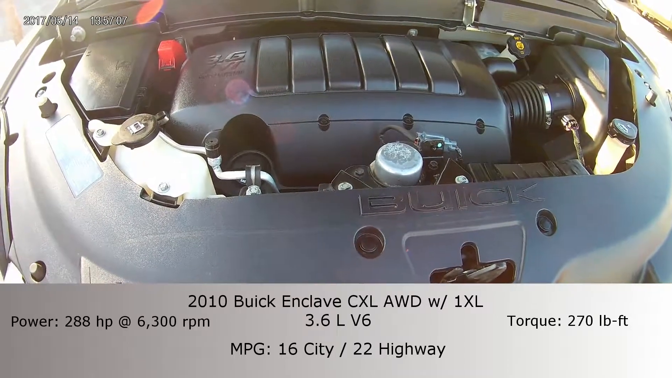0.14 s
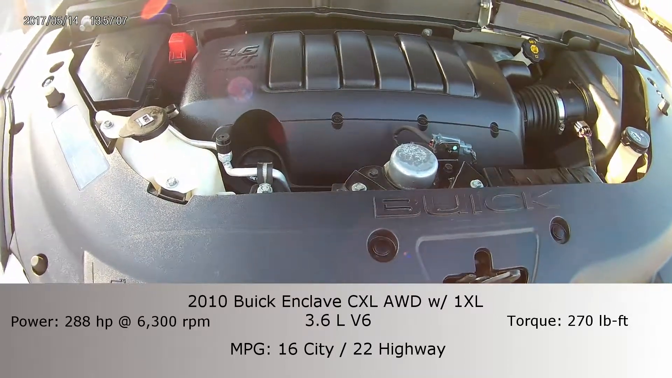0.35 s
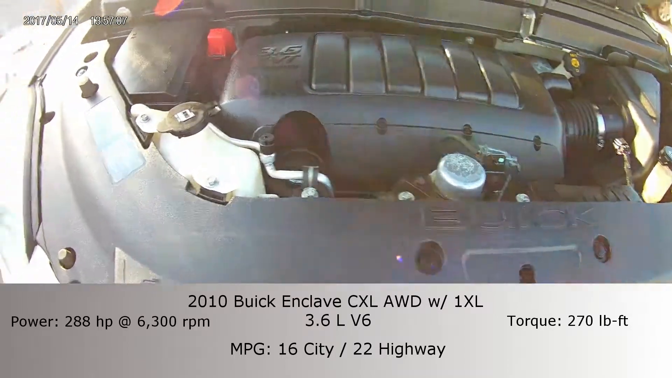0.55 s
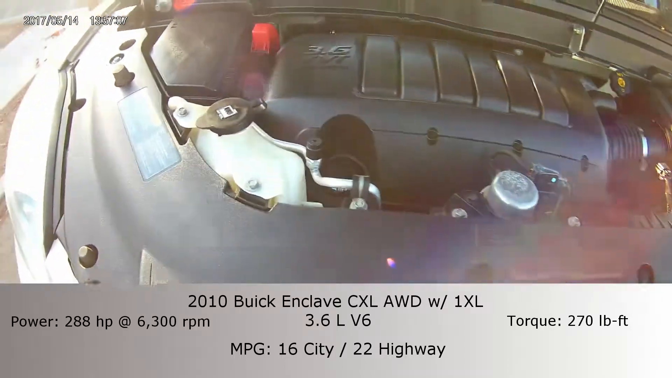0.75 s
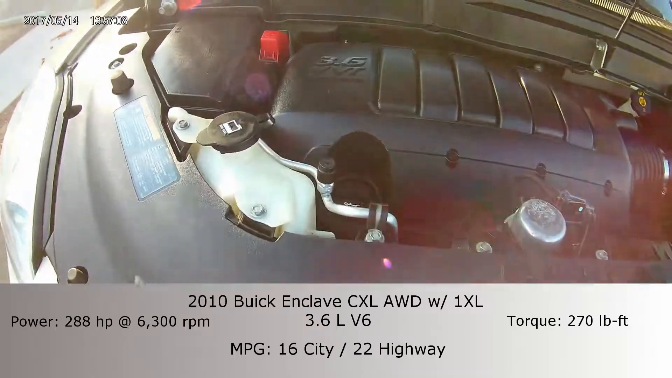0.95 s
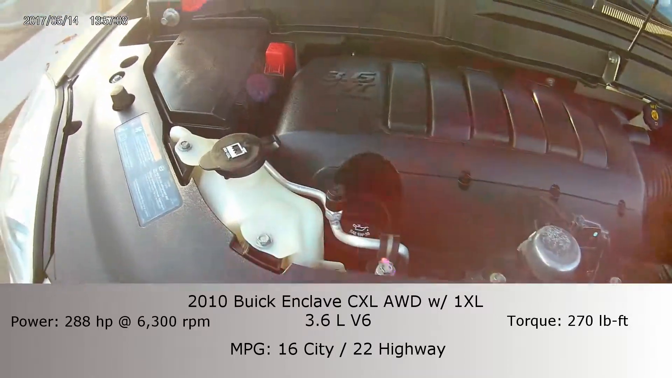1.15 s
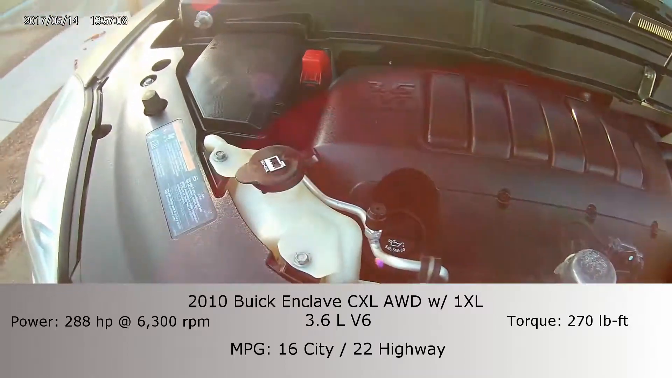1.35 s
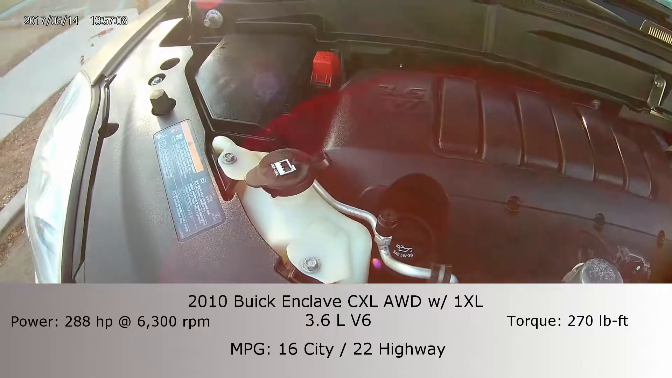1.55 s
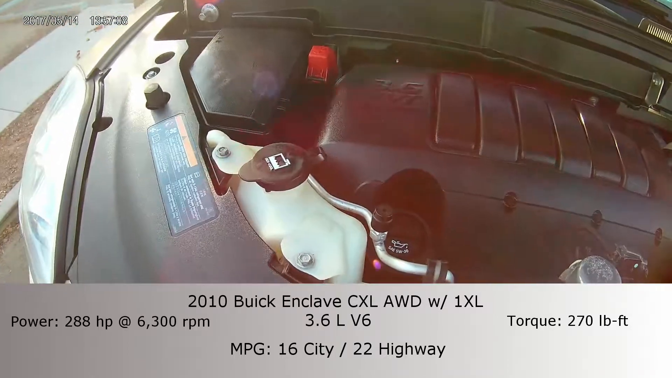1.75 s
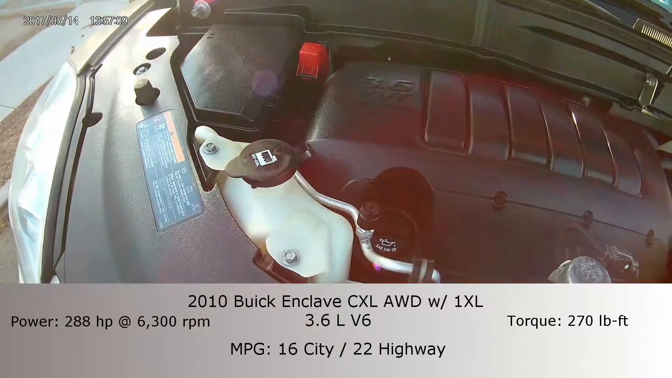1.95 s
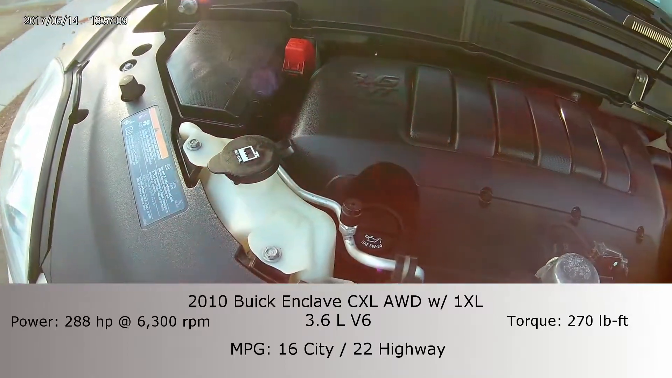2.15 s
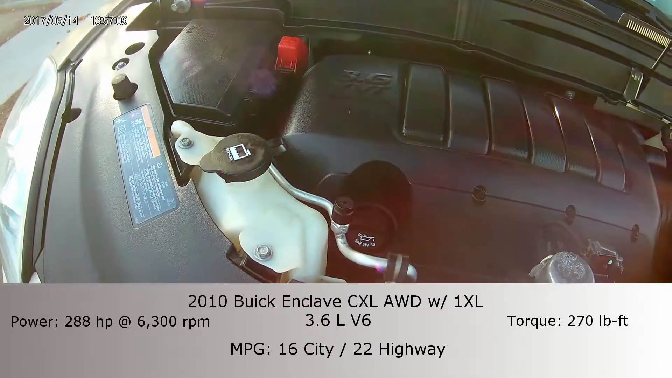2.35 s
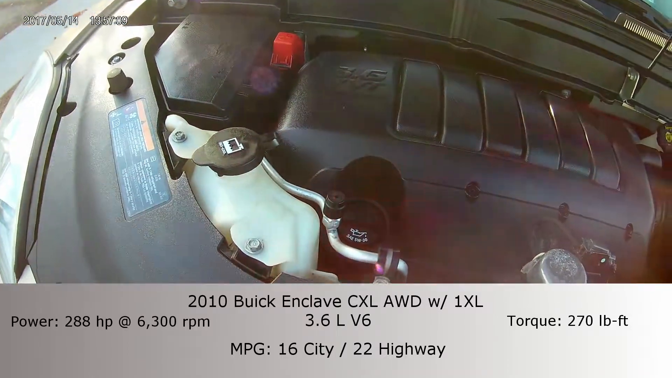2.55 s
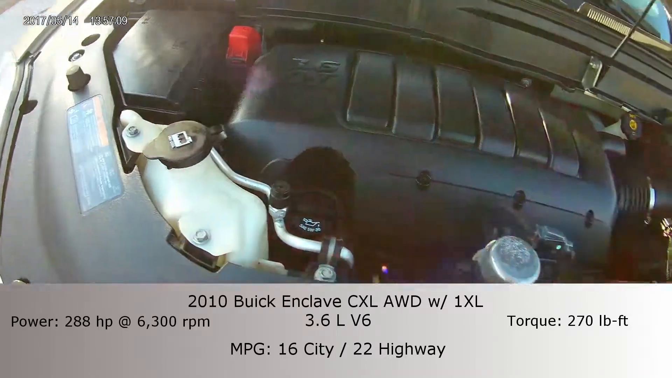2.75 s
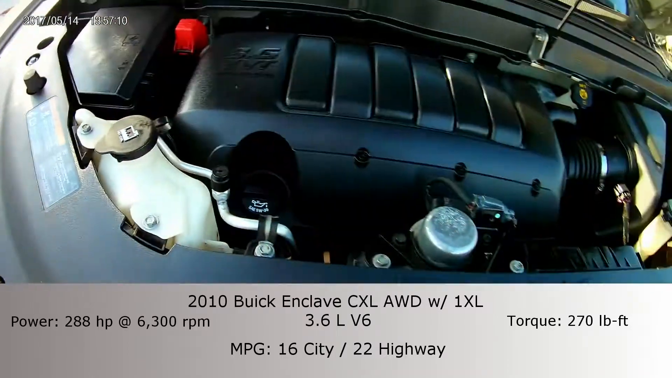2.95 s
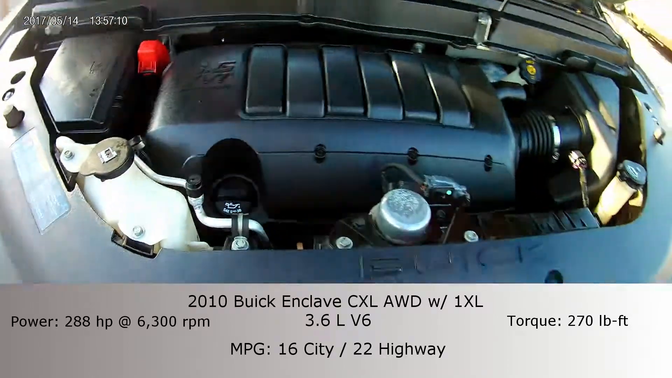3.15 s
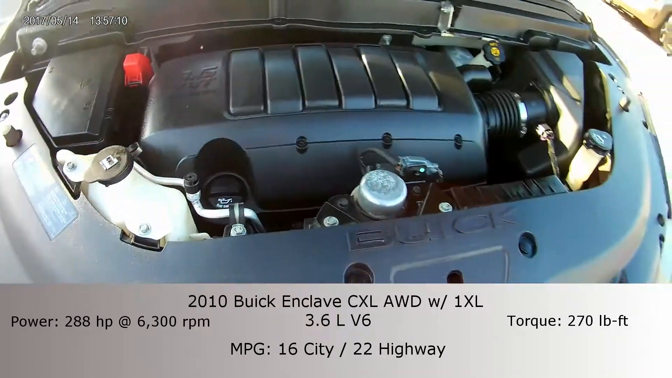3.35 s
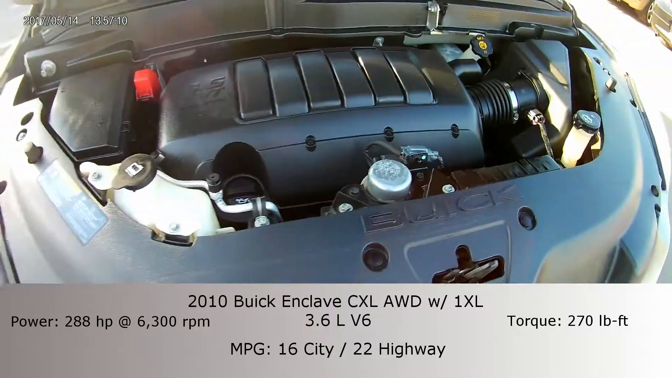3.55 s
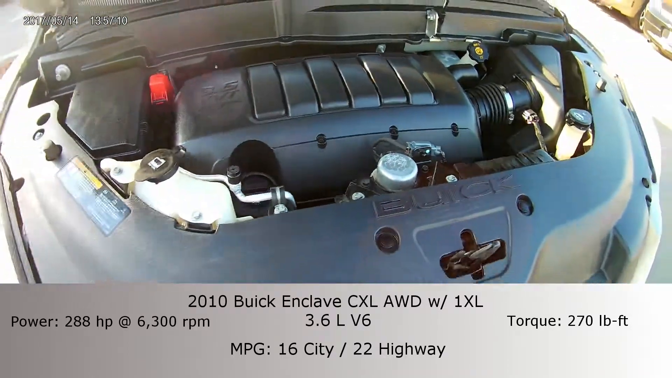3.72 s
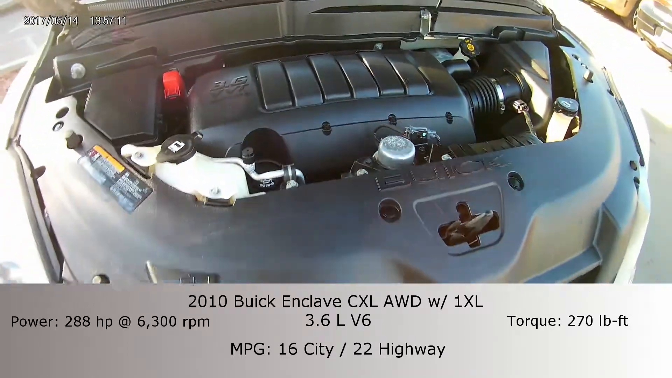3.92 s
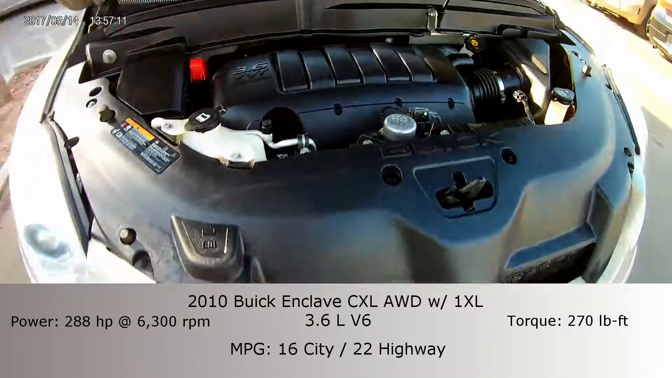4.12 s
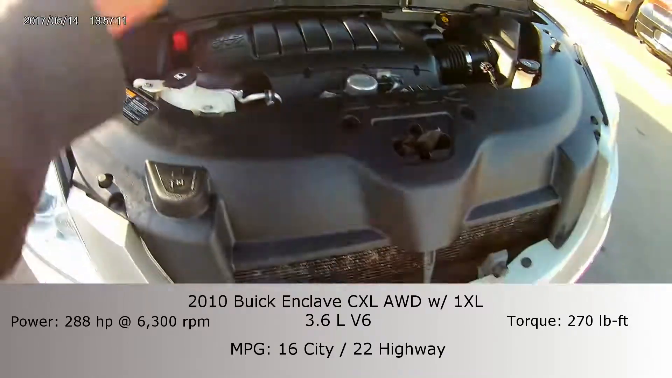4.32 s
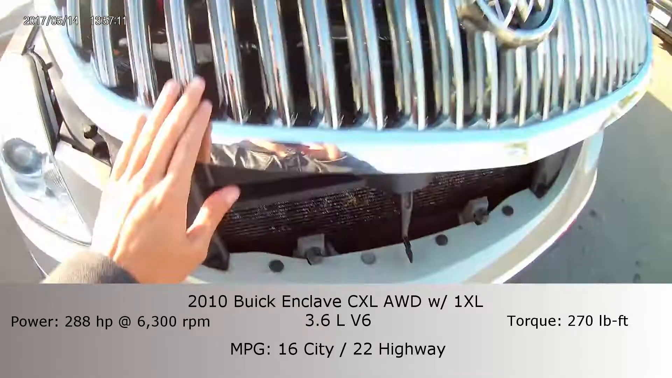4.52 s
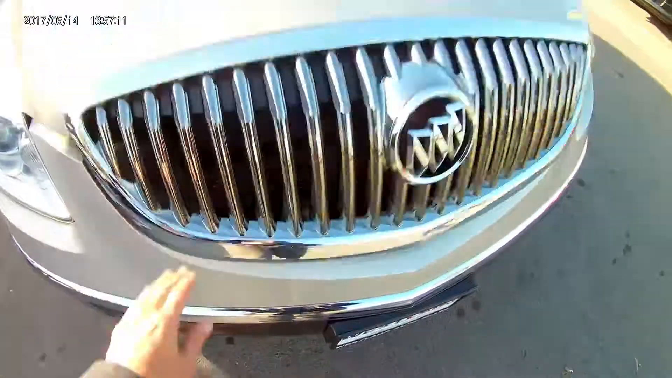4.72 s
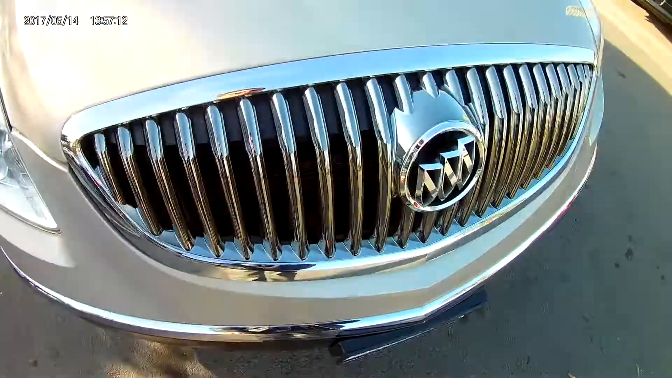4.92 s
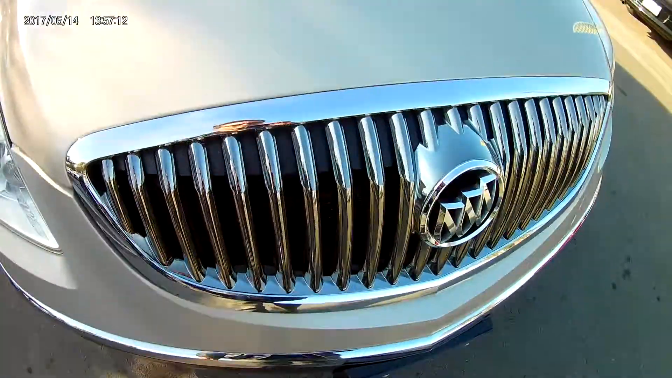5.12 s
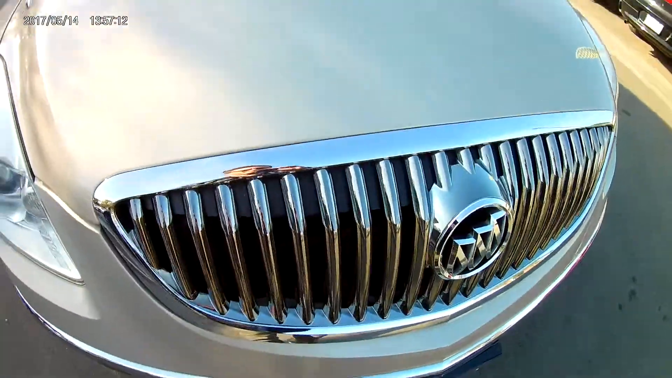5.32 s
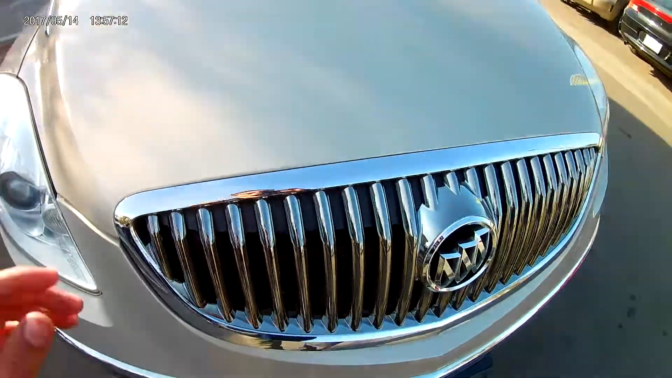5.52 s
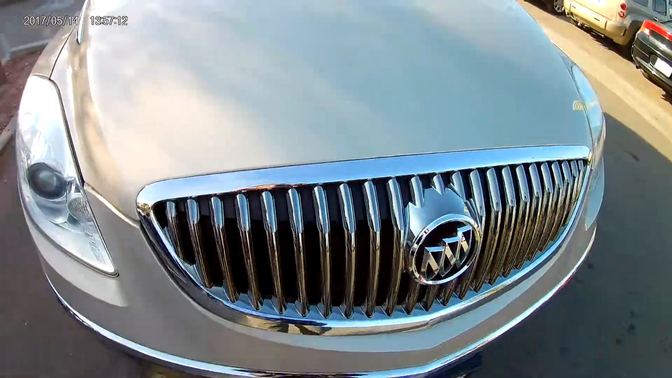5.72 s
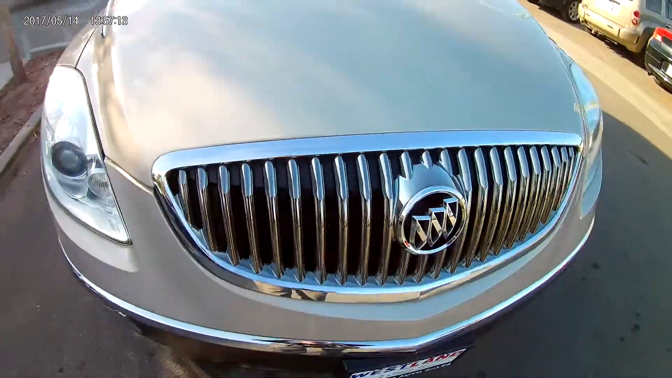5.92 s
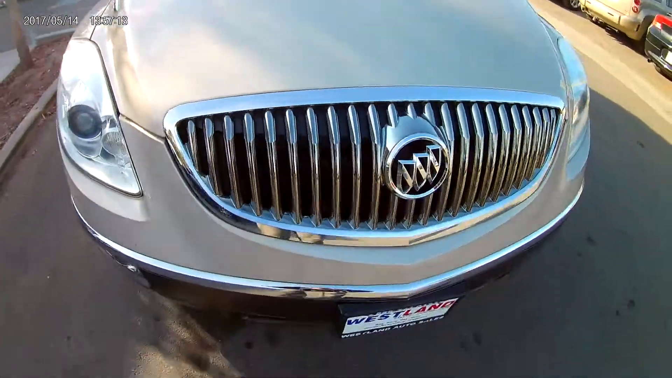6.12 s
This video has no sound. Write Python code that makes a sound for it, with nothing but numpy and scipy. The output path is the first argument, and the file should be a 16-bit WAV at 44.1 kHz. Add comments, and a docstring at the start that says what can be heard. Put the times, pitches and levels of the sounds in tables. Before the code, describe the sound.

Outdoors beside a parked car, a low road rumble and wavering engine hum run throughout. Faint plastic ticks dot the first seconds. Near four seconds the hood struts hiss in creaky slips and hinges groan softly; then the hood slams with a loud, clattering steel bang that overloads the small close microphone. Short echoes fade, leaving the same hum.

```python
"""A far road roars and engines hum all through; faint brief puffs of treble noise and small plastic ticks come and go.
Then a car's steel hood is pulled down: gas hisses through its struts in slips, the hinges groan, air is pushed out.
It slams on its latch in a run of blows that ring damped steel modes, shake loose trim (chattering noise) and
dip the car on its springs, with echoes off parked cars. The small microphone overloads and hisses."""
import sys
import numpy as np
from scipy import signal
from scipy.fft import rfft, irfft, next_fast_len
from scipy.io import wavfile
from scipy.ndimage import uniform_filter1d, map_coordinates

SR = 44100
rng = np.random.default_rng(int(sys.argv[2]) if len(sys.argv) > 2 else 0)


def file_out(sig):
    """Save sig as 16-bit WAV at sys.argv[1]."""
    # one column per channel
    cols = np.atleast_2d(sig).T
    # limit, then scale
    lim = np.clip(cols, -1, 1)
    pcm = np.round(lim * 32767).astype(np.int16)
    wavfile.write(sys.argv[1], SR, pcm)


N = 276418
T = np.arange(N) / SR


def amp(db):
    """Decibels to gain."""
    return 10 ** (np.asarray(db) / 20)


def unit(x):
    """Scaled to rms 1."""
    return x / np.sqrt(np.mean(x ** 2) + 1e-20)


def along(points, hz):
    """(Hz, value) points read along a log frequency axis."""
    f, v = np.transpose(points)
    return np.interp(np.log(hz + 1), np.log(f + 1), v)


def curves(rows):
    """One value per sample for each column after the time."""
    s, *cols = np.transpose(rows)
    return [np.interp(T, s, c) for c in cols]


def wobble(rate):
    """A smooth random curve, rate knots a second."""
    knots = rng.standard_normal(int(N * rate / SR) + 4)
    return map_coordinates(knots, [T * rate])


def gate(start, end, fade):
    """1 from start to end, fading to 0 outside."""
    return np.clip(np.minimum(T - start, end - T) / fade + 1, 0, 1)


def swell(start, peak, end):
    """A smooth rise to 1 and fall to 0."""
    return np.sin(np.pi / 2 * np.interp(T, [start, peak, end], [0, 1, 0]))


def filtered(x, response):
    """x times a response of frequency."""
    m = next_fast_len(len(x) + 8192)
    return irfft(rfft(x, m) * response(np.fft.rfftfreq(m, 1 / SR)), m)[:len(x)]


def resonances(modes):
    """The summed response of (Hz, width, dB) resonances, with alternating signs."""
    def response(f):
        total = 0
        for k, (centre, width, db) in enumerate(modes):
            damping = 1j * f * width
            total = total + (-1) ** k * amp(db) * damping / (centre * centre - f * f + damping + 1e-9)
        return total
    return response


def rush(spectrum, patchy_db):
    """Noise of rms 1, shaped by a spectrum, with time-frequency patches of random gain."""
    z = signal.stft(rng.standard_normal(N + 512), nperseg=512)[2]
    across_pitch = uniform_filter1d(rng.standard_normal(z.shape), 5, 0)
    patches = unit(uniform_filter1d(across_pitch, 14, 1))
    noise = signal.istft(z * amp(patchy_db * patches), nperseg=512)[1][:N]
    return unit(filtered(noise, lambda hz: amp(along(spectrum, hz))))


def tone(hz, db, waver_db, drift):
    """A sine around the given rms level, unsteady in pitch and loudness."""
    phase = 2 * np.pi * np.cumsum(hz * (1 + drift * wobble(9))) / SR
    level = np.sqrt(2) * amp(db + waver_db * wobble(7))
    return level * np.sin(phase + rng.uniform(0, 2 * np.pi))


def ringing(modes, t, attack, scatter_db, detune):
    """Damped modes, at new strengths, signs and slightly new pitches as each blow flexes the steel."""
    luck = rng.standard_normal((len(modes), 3))
    total = 0
    for (hz, db, t60), (strength, shift, sign) in zip(modes, luck):
        decay = amp(db + scatter_db * strength - 60 * t / t60)
        total = total + np.sign(sign) * decay * np.sin(2 * np.pi * hz * (1 + detune * shift) * t)
    return (1 - np.exp(-t / attack)) * total


def traffic():
    """A far road: exhaust rumble, a middle drone, tyre roar and tyre sizzle as four drifting noise bands."""
    # the road's swells: t/s, rumble level/dB, middle drone level/dB, tyre roar level/dB, tyre sizzle level/dB
    road_levels = [(0, -42, -45, -43, -58.5), (.2, -36.5, -45, -41, -60), (.9, -38, -47.5, -43, -60),
                   (1.42, -39.5, -54, -44.5, -62), (2.2, -41, -52.5, -45.5, -62.5),
                   (2.8, -40.5, -53, -47, -62.5), (3.28, -41, -51.5, -45.5, -60),
                   (3.6, -40, -46.5, -44, -57), (4.05, -38, -43.5, -43.5, -59.5),
                   (4.6, -40, -45.5, -42, -58), (5.12, -38, -44, -41.5, -60),
                   (5.4, -38.5, -46.5, -45, -61.5), (5.75, -38, -46, -42.5, -59.5),
                   (6.27, -38.5, -45, -41, -60.5)]
    # exhaust rumble: f/Hz, relative level per Hz/dB
    rumble_spectrum = [(12, -54), (20, -12.5), (40, -5), (91, -3.5), (167, -8), (188, -19.5), (238, -8),
                       (375, -16), (450, -26.5), (580, -60), (990, -120)]
    # middle drone: f/Hz, relative level per Hz/dB
    drone_spectrum = [(200, 12.5), (330, -4.5), (480, 4), (700, -10), (1000, -9.5)]
    # tyre roar: f/Hz, relative level per Hz/dB
    tyre_spectrum = [(320, -30), (550, -3.5), (688, -1), (1020, 0), (1150, -2.5), (1380, -4), (1800, -12.5),
                     (2340, -31), (3960, -120)]
    # tyre sizzle: f/Hz, relative level per Hz/dB
    sizzle_spectrum = [(1060, -39), (1800, 0), (2160, -5), (2920, -15.5), (4130, -23.5), (6000, -37),
                       (7800, -44), (13200, -120)]
    rumble_db, drone_db, tyre_db, sizzle_db = curves(road_levels)
    drone_band = [(22, -120), *drone_spectrum, (3000, -120)]
    rumble = amp(rumble_db + 0.83 * wobble(4.03)) * rush(rumble_spectrum, patchy_db=0.43)
    drone = amp(drone_db + 1.34 * wobble(3.996)) * rush(drone_band, patchy_db=0.3)
    tyres = amp(tyre_db + 0.63 * wobble(6)) * rush(tyre_spectrum, patchy_db=1.1)
    sizzle = amp(sizzle_db + 0.6 * wobble(6)) * rush(sizzle_spectrum, patchy_db=1.3)
    return rumble + drone + tyres + sizzle


def engines():
    """Wavering sines: an idle near by that sinks once, and gliding engine notes that come and go on the road."""
    # steady orders of the idling engine: f/Hz, level/dB
    idle_orders = [(60, -47), (90, -44)]
    # engines on the road: start t/s, end t/s, first f/Hz, last f/Hz, level/dB
    road_notes = [(.1, .6, 52.1, 52, -47), (.1, 0.957, 126, 126.2, -42), (0.105, 1.456, 167, 163.2, -45),
                  (.15, 1.1, 221, 221, -51), (1.8, 3.448, 163, 159.9, -47), (2.05, 4.6, 50.9, 50.87, -45.5),
                  (2.9, 3.797, 125.1, 132.8, -46), (4.352, 4.6, 134.8, 138, -46),
                  (5.55, 5.894, 114.2, 111.6, -37), (6.05, 6.398, 241.4, 236.5, -45.5)]
    drift = 0.005  # pitch unsteadiness, as a fraction
    fade_db = -3.5 * gate(3.8, N / SR, fade=0.6)  # the idle sinks as the listener steps back, done by 3.8 s
    out = sum(tone(hz, db + fade_db, waver_db=1.5, drift=drift) for hz, db in idle_orders)
    for start, end, first_hz, last_hz, db in road_notes:
        glide_hz = np.interp(T, [start, end], [first_hz, last_hz])
        out = out + gate(start, end, fade=0.05) * tone(glide_hz, db, waver_db=2.0, drift=drift)
    return out


def treble_puffs():
    """Faint brief puffs of treble noise: a broad resonance shapes the noise, each puff swells and fades quickly."""
    # puffs: peak t/s, level/dB
    puffs = [(.184, -74), (.268, -71), (.575, -74), (5.594, -72), (5.7, -72), (5.742, -73)]
    rise_s, fall_s = 0.03, 0.015
    treble = resonances([(9500, 6000, 0)])
    noise = unit(filtered(rng.standard_normal(N), lambda f: treble(f) ** 2))
    return sum(amp(db) * swell(s - rise_s, s, s + fall_s) for s, db in puffs) * noise


def ticks():
    """Plastic trim ticks under a hand: a short pitched noise burst, a brighter snap and a dull knock."""
    # clacks: t/s, level/dB, pitch f/Hz, bright snap level/dB (relative)
    clacks = [(2.639, -68, 3800, -10), (2.823, -64, 3940, -12), (3.397, -63, 4760, -14),
              (3.49, -77, 4900, -17), (3.561, -56, 4500, -10), (3.636, -60, 4450, -27),
              (3.682, -65, 4670, -18), (3.706, -57.5, 4140, -18), (4.143, -59, 4170, -14),
              (4.665, -58, 3290, -16), (5.196, -56, 3300, -2)]
    out, t = np.zeros(N + SR), T[:SR // 20]
    for s, db, hz, snap_db in clacks:
        envelope = amp(-60 * t / 0.049) * (1 - np.exp(-t / 0.0009))
        burst = rng.standard_normal((3, len(t))) * envelope
        plastic = resonances([(hz, 2100, 4.6)])
        pitched = filtered(burst[0], lambda f: plastic(f) ** 3)
        snap = amp(snap_db) * filtered(burst[1], resonances([(6000, 9000, 0)]))
        knock = filtered(burst[2], resonances([(1400, 710, 16)]))
        out[round(s * SR):][:len(t)] += amp(db) * (pitched + snap + knock)
    return out[:N]


def struts():
    """Gas forced through the strut valves in slips, a dull groan of the hinges and air pushed out of the bay."""
    # hood moves: start t/s, fastest t/s, stop t/s, hiss level/dB, groan level/dB, air level/dB, creak 0-1
    moves = [(3.82, 3.9, 4.13, -66.5, -42, -48.5, .7), (4.047, 4.205, 4.45, -73.5, -48, -53.5, .1),
             (4.61, 4.693, 4.75, -60, -43.5, -41, 0.25)]
    # valve hiss resonances: f/Hz, width/Hz, relative level/dB
    valve_modes = [(3860, 430, 8), (5960, 4100, -7)]
    # hinge groan resonances, before squaring: f/Hz, width/Hz, relative level/dB
    hinge_modes = [(945, 144, 0), (1302, 220, -0.5)]
    # air squeezed out of the bay, before squaring: f/Hz, width/Hz, relative level/dB
    air_modes = [(546, 490, 0.5), (1520, 1220, 0)]
    slip_rate, slip_scatter, slip_sharpness = 94, 0.04, 6  # slips a second, unevenness, how brief each is
    valve, hinge, bay = resonances(valve_modes), resonances(hinge_modes), resonances(air_modes)
    hiss = unit(filtered(rng.standard_normal(N), lambda f: valve(f) / (1 + (f / 7300) ** 24)))
    groan = unit(filtered(rng.standard_normal(N), lambda f: hinge(f) ** 2))
    air = unit(filtered(rng.standard_normal(N), lambda f: np.abs(bay(f)) ** 2))
    turns = np.cumsum(slip_rate * (1 + slip_scatter * wobble(40))) / SR
    slips = unit(np.abs(np.sin(np.pi * turns)) ** slip_sharpness)
    out = np.zeros(N)
    for start, peak, end, hiss_db, groan_db, air_db, creak in moves:
        jerk = 1 + np.clip(creak, 0, 1) * (slips - 1)  # 0 hisses evenly, 1 hisses only in slips
        sound = jerk * amp(hiss_db) * hiss + amp(groan_db) * groan + amp(air_db) * air
        out += swell(start, peak, end) * sound
    return out


def slam():
    """Each contact rings sheet, ribs, catch and body and sets the loose trim shaking; the car dips once."""
    # latch, bumpers and bounces: t/s, steel on steel level/dB, push level/dB
    blows = [(4.7853, -8, -6.5), (4.7915, -22, -2.5), (4.801, -3, -2.5), (4.815, -1.5, 0), (4.8292, -5, -1),
             (4.8423, -10, -1), (4.8594, -10, -5.5), (4.8743, -10, -1.5), (4.881, -11.5, -3),
             (4.9063, -14.5, -4.5), (4.917, -17.5, -6), (4.928, -17.5, -16), (4.9446, -36, -14.5),
             (4.9641, -44, -13.5)]
    # the wide sheet: f/Hz, relative level/dB, t60/s
    panel_modes = [(222.4, -6.5, 0.096), (296, -7, 0.13), (339, -2, 0.11), (364, -3.5, 0.062),
                   (426.6, -10, 0.16), (514, -15.5, 0.071), (565, -9.5, 0.089)]
    # the ribs: f/Hz, relative level/dB, t60/s
    rib_modes = [(636.4, -9.5, 0.1), (733, -7, 0.14), (833.7, -3, 0.085), (944, -9, 0.065),
                 (1052, -8, 0.17), (1137, -9, 0.1), (1302, -4.5, 0.053), (1491, -8, 0.057),
                 (1703, -7, 0.062), (1952, -7, 0.071), (2318, -18.5, 0.076)]
    # the steel catch: f/Hz, relative level/dB, t60/s
    catch_modes = [(2614, -13, 0.084), (4034, -9, 0.026), (5670, -13, 0.036), (6900, -14, 0.021)]
    # the engine bay: f/Hz, relative level/dB, t60/s
    bay_modes = [(73, -13, 0.096), (90, -3, .11), (130.5, -5.5, 0.13), (173, -10, 0.097)]
    # the front springs, before the slow swell: f/Hz, level/dB, t60/s
    spring_modes = [(53, 3, 0.18)]
    # rattle of the loose trim: f/Hz, relative level per Hz/dB
    rattle_spectrum = [(290, -27), (500, 4.5), (739, 0.5), (1070, -7), (1150, -11), (1400, -3), (1530, -2),
                       (2500, -21), (3250, -50), (5500, -120)]
    # bright jingle of the loose trim: f/Hz, relative level per Hz/dB
    jingle_spectrum = [(1470, -32), (2500, -4), (4320, -7), (5670, -17), (6820, -12.5), (7620, -23),
                       (11400, -21), (12100, -19), (15700, -53), (22000, -120)]
    boom_db, catch_db, thump_db, rattle_db, jingle_db = 1.8, -12.5, -2.5, -9, -18  # over each blow
    rattle_t60_s, jingle_t60_s = 0.11, 0.11  # loose trim settles after a blow
    dip_s, dip_rise_s = 4.795, 0.039  # weight comes onto the springs; its swell passes unity gain this much later
    seal_s, seal_db, seal_grip_s = 4.884, -10.5, 0.011  # the rubber seal grips and damps

    sheet, out, rattle_power, jingle_power = np.zeros((4, N))
    t = T[:SR // 2]
    sealed = amp(seal_db * gate(seal_s + seal_grip_s, N / SR, fade=seal_grip_s))
    for s, steel_db, push_db in blows:
        at = round(s * SR)
        boom = ringing(panel_modes, t, attack=0.0013, scatter_db=1.0, detune=0.016)
        clang = ringing(rib_modes, t, attack=0.0016, scatter_db=2, detune=0.0256)
        catch = ringing(catch_modes, t, attack=0.00058, scatter_db=3.0, detune=0.023)
        thump = ringing(bay_modes, t, attack=0.0027, scatter_db=3.0, detune=0.021)
        sheet[at:][:len(t)] += amp(push_db + boom_db) * boom
        steel = amp(steel_db) * clang + amp(steel_db + catch_db) * catch
        out[at:][:len(t)] += steel + amp(push_db + thump_db) * thump
        # the seal damps only the trim that was already shaking when it gripped
        grip = sealed[at:][:len(t)] if s < seal_s else 1
        onset = (1 - np.exp(-t / 0.0011)) * grip
        rattle_power[at:][:len(t)] += (amp(steel_db + rattle_db - 60 * t / rattle_t60_s) * onset) ** 2
        jingle_power[at:][:len(t)] += (amp(steel_db + jingle_db - 60 * t / jingle_t60_s) * onset) ** 2
    dip = ringing(spring_modes, t, attack=0.005, scatter_db=1.0, detune=0.021)
    sheet[round(dip_s * SR):][:len(t)] += (t / dip_rise_s) ** 2 * dip
    chatter = amp(2.2 * wobble(300))  # many small contacts, not an even hiss
    rattle = np.sqrt(rattle_power) * rush(rattle_spectrum, patchy_db=1.5)
    jingle = np.sqrt(jingle_power) * rush(jingle_spectrum, patchy_db=1.0)
    return out + sheet * sealed + chatter * (rattle + jingle)


def lot(x):
    """Echoes off parked cars: a decaying noise tail in which each frequency dies at its own speed."""
    # echo decay: f/Hz, t60/s
    echo_decay = [(100, 0.58), (1000, 0.25), (3800, 0.33), (6000, 0.26), (10000, 0.33)]
    hz, t, z = signal.stft(rng.standard_normal(SR // 2), SR, nperseg=256)
    decay = amp(-60 * t / along(echo_decay, hz)[:, None])
    tail = signal.istft(z * decay, SR, nperseg=256)[1]
    delayed = np.pad(x, (700, 0))  # 16 ms before the first echo
    return signal.fftconvolve(delayed, tail / np.linalg.norm(tail))[:N]


def scene():
    """Road and engines under the treble puffs, the ticks, the moving hood, its slam and the slam's echoes."""
    hood = slam()
    around = traffic() + engines() + treble_puffs() + ticks()
    return (around + struts() + hood + amp(-16) * lot(hood))[None]


def record(dry):
    """The input clips at its ceiling, adds its hiss and keeps nothing above its band limit."""
    # microphone self-noise: f/Hz, relative level per Hz/dB
    hiss_spectrum = [(2350, -36), (4000, -2.5), (6180, -9), (8020, -8), (10800, -9), (12200, -10.5),
                     (15900, -41), (22000, -120)]
    hiss_db, top_hz = -74.5, 12150  # hiss level ahead of the band limit
    clipped = np.clip(dry[0], -0.98, 0.98)
    hiss = amp(hiss_db) * rush(hiss_spectrum, patchy_db=0.5)
    return filtered(clipped + hiss, lambda hz: hz < top_hz)[None]


dry = scene()
out = record(dry)
file_out(out)
```